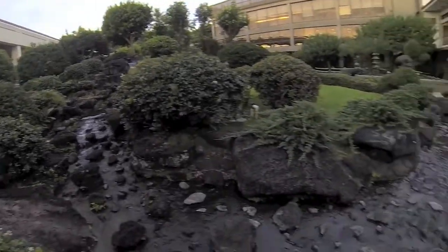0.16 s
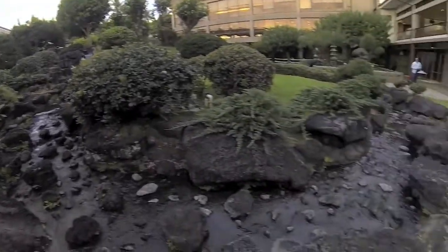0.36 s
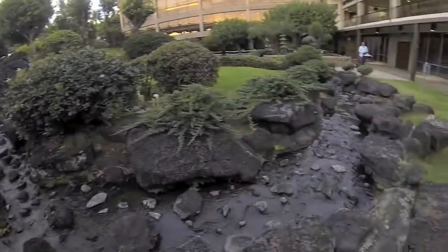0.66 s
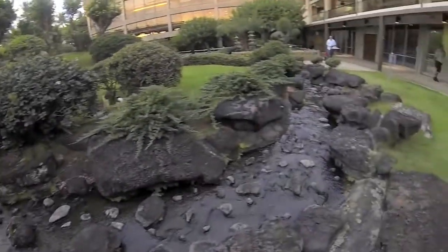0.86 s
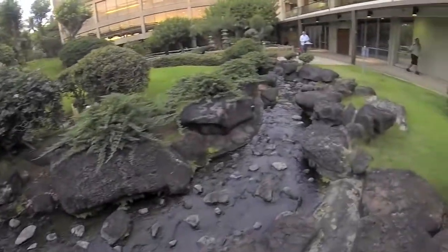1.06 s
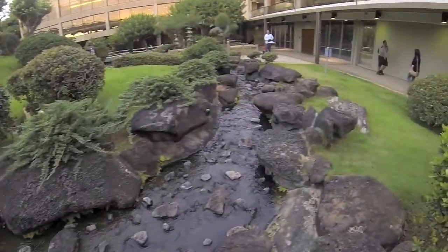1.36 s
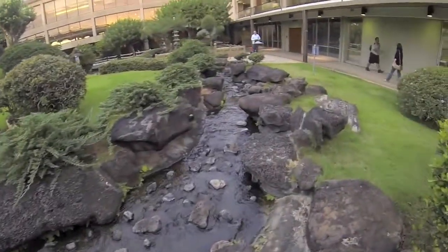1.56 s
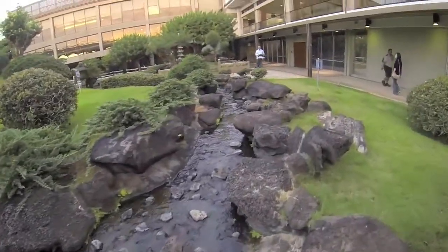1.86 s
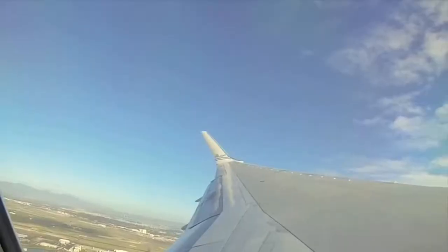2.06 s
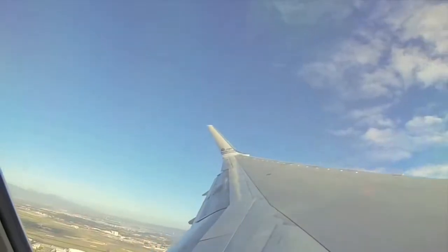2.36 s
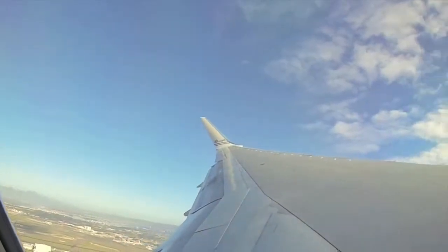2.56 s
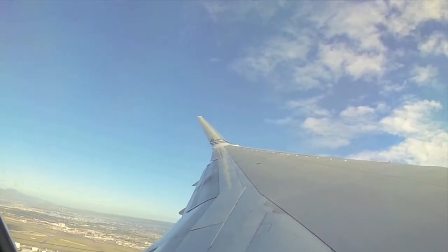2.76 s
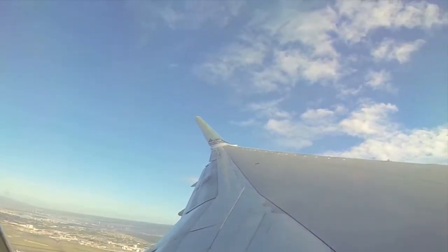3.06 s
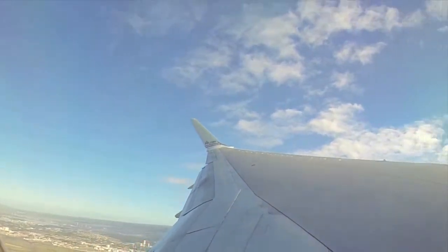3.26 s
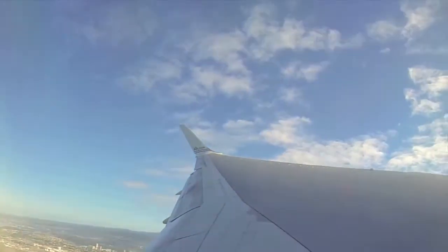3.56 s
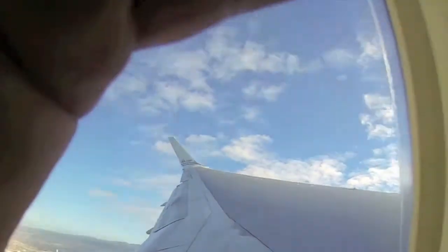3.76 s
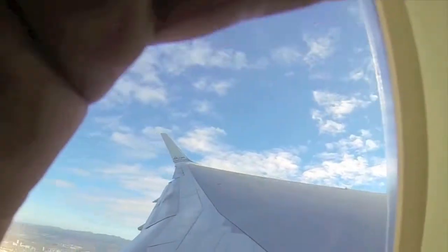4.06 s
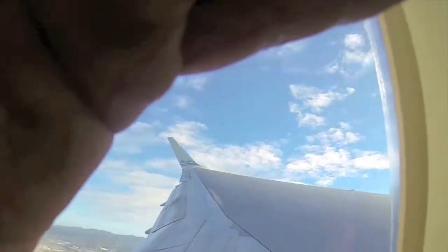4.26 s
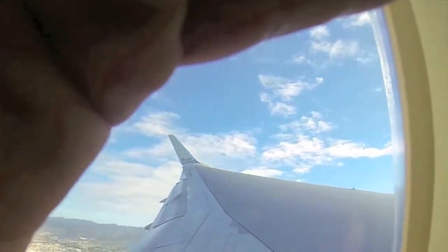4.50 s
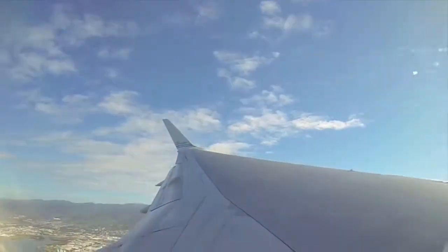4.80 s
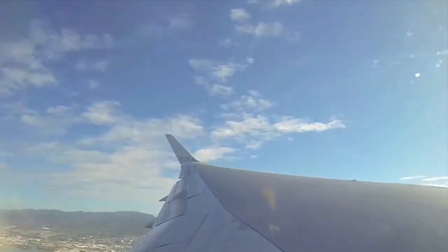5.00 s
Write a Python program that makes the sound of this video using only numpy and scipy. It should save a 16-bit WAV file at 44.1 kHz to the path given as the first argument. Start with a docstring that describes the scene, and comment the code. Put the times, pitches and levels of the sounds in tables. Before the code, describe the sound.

Low microphone rumble and faint water, then steady airliner cabin roar and hum that dips and swells as a hand grips the microphone.

```python
"""A deep handling rumble comes first, with soft knocks and muffled water: a garden brook, heard from
a microphone inside a small plastic camera carried along it. Then the scene changes to the window of
a climbing airliner, where airflow and engines roar and ring in the case, with faint turbine whines.
Right at the microphone a hand closes round the case and damps its ringing, rubs and clicks on it,
then presses it to the window, where it rings again."""
import sys
import numpy as np
from scipy import signal
from scipy.fft import rfft, irfft
from scipy.io import wavfile
from scipy.ndimage import uniform_filter1d

SR = 44100
rng = np.random.default_rng(int(sys.argv[2]) if len(sys.argv) > 2 else 0)


def wrap_up_sound(samples):
    """Save the sound to the file named by the first command line argument, as 16-bit audio."""
    columns = np.atleast_2d(samples).T
    # keep every value between -1 and 1, then stretch to whole-number steps
    tamed = np.clip(columns, -1, 1)
    steps = np.round(tamed * 32767).astype(np.int16)
    wavfile.write(sys.argv[1], SR, steps)


N = 226432
T = np.arange(N) / SR
HZ = np.maximum(np.arange(N // 2 + 1) * SR / N, 1)


# Airflow and engines at the window seat: f/Hz, relative level/dB
ROAR_SPECTRUM = [(25, -23), (60, -13), (110, -6), (170, -3.5), (280, -5), (420, 0), (700, -0.5), (1200, -2),
                 (1700, -13), (2100, -8), (2600, -14), (3200, -23.5), (4500, -36.5), (7000, -40.5)]
# Resonances of the case round the microphone, in each hold: f/Hz, width/Hz, boost/dB
LOOSE_MODES = [(395, 39, 10), (548, 225, 4), (957, 98, 13.5), (1600, 300, 6.5), (3020, 240, 4.5)]
GRIPPED_MODES = [(376, 48, 8.5), (1026, 46, 3.5), (2720, 460, -2)]
PRESSED_MODES = [(90, 130, 8), (240, 97, -8.5), (380, 86, 9), (478, 28, 9), (560, 49, -1), (725, 180, -4.5),
                 (924, 175, 13), (1336, 120, 7), (1744, 24, 13.5), (2610, 390, 6.5)]
# Brief swells of the roar: t/s, added level/dB
ROAR_SWELLS = [(3.18, 1.5), (3.36, 2), (3.59, 1), (5.05, 2.5)]

def roar(grip, pressure, loose_db=-25, grip_db=-5, press_db=3.5, flutter_db=0.55, swell_s=0.029):
    """Turbulent noise rings the case; gripping damps it, pressing it to the window feeds it."""
    holds = (LOOSE_MODES, GRIPPED_MODES, PRESSED_MODES)
    loose, gripped, pressed = (noise(colour(ROAR_SPECTRUM, modes)) for modes in holds)
    in_hand = np.sqrt(1 - grip) * loose + np.sqrt(grip) * gripped
    swell_db = sum(db * np.exp(-((T - s) / swell_s) ** 2) for s, db in ROAR_SWELLS)
    level_db = loose_db + grip_db * grip + press_db * pressure + swell_db + flutter_db * drift(7.9)
    return from_db(level_db) * (np.sqrt(1 - pressure) * in_hand + np.sqrt(pressure) * pressed)


# The hand closes round the case: t/s, length/s, firmness aimed for (0-1)
GRIPS = [(3.44, 0.086, 0.61), (3.668, 1.7, 0.96)]

def hand(ramp_s=0.12, pressed_s=4.9, lean_s=0.088):
    """Grip on the case and pressure against the window, both 0-1; the push is full at pressed_s."""
    grip = sum(firmness * held(s, length, ramp_s) for s, length, firmness in GRIPS)
    pressure = np.exp(np.minimum(T - pressed_s, 0) / lean_s)
    return np.clip(grip, 0, 1), pressure


# Handling rumble on the garden walk, right at the microphone: f/Hz, relative level/dB
RUMBLE_SPECTRUM = [(15, 2), (26, 3.5), (42, -12), (65, -9.5), (90, -23.5), (120, -26), (160, -37),
                   (240, -45.5), (380, -48.5), (600, -64.5)]
# The case sways with the walk: t/s, length/s, added level/dB
SWAYS = [(0.0, 0.32, 2), (0.49, 0.557, 4), (1.57, 0.12, 4.5), (1.8, 0.21, 5)]

def handling_rumble(calm_db=-27, ramp_s=0.078):
    """Carrying shakes the case with a deep rumble that grows with each sway."""
    rumble = noise(colour(RUMBLE_SPECTRUM))
    rumble /= np.sqrt(uniform_filter1d(rumble ** 2, size=SR // 6))   # the walk alone sets the swell
    sway_db = sum(db * held(s, length, ramp_s) for s, length, db in SWAYS)
    return from_db(calm_db + sway_db) * rumble


# Knocks on the microphone's case: t/s, peak level/dB, ring f/Hz, upper edge f/Hz (higher is harder)
KNOCKS = [(0.21, -31, 220, 417), (0.226, -36, 216, 420), (0.237, -33, 220, 450), (0.249, -32.5, 190, 300),
          (1.117, -31.5, 174, 450), (1.754, -16, 158, 643), (3.547, -29.5, 45, 110), (4.152, -27, 220, 500),
          (4.627, -7, 613, 6000)]

def knocks(cycles=2.46, bass_edge=0.55):
    """A blow gives the case one heavily damped swing; a soft contact takes the top off it."""
    out = np.zeros(N)
    for s, db, hz, edge_hz in KNOCKS:
        swing = ring(np.arange(N) == round(s * SR), hz, cycles / hz)
        swing = signal.sosfilt(signal.butter(3, edge_hz, fs=SR, output="sos"), swing)
        swing = signal.sosfilt(signal.butter(1, bass_edge * hz, "high", fs=SR, output="sos"), swing)
        out += from_db(db) * swing / np.abs(swing).max()
    return out


# Skin on plastic, right at the microphone: f/Hz, relative level/dB
FRICTION_SPECTRUM = [(2500, -23), (4500, -16), (5700, -1.5), (7000, -9), (9000, -7.5), (12000, 5),
                     (14000, 4.5), (15700, -10)]
# Finger slides: t/s, length/s, level/dB, brightness/(dB per octave)
RUBS = [(2.512, 0.053, -55, 1), (3.547, 0.017, -40.5, -13), (3.745, 0.019, -51, 0),
        (3.819, 0.033, -47.5, -13), (3.873, 0.031, -54, -7), (4.208, 0.025, -53, -1),
        (4.314, 0.021, -44.5, -1.5), (4.613, 0.034, -39.5, -2), (4.642, 0.065, -32.5, -4.5),
        (4.713, 0.028, -42.5, -20)]
# Small sharp ticks of the case: t/s, relative level/dB
TICKS = [(2.533, -41), (2.572, -30), (3.853, -25.5), (4.154, -29.5), (4.207, -35), (4.647, -16)]

def fingers(edge_s=0.011, grain_db=1.3, tick_t60=0.0075):
    """Skin sticks and slips on the plastic in grainy bursts; the case ticks now and then."""
    friction = colour(FRICTION_SPECTRUM)
    grain = from_db(grain_db * drift(200))
    rubs = np.zeros(N)
    for s, length, db, brightness in RUBS:
        tilt = from_db(brightness * np.log2(HZ / HZ[-1]))
        rubs += from_db(db) * held(s, length, edge_s) * grain * noise(friction * tilt)
    tick_decays = sum(from_db(db - 60 * np.abs(T - s) / tick_t60) * (T >= s) for s, db in TICKS)
    return rubs + .5 * tick_decays * noise(friction)


# Shaft and turbine tones, heard from inside the cabin:
# harmonic number, level/dB held loosely, change/dB at full grip, change/dB at full pressure
SHAFT_HARMONICS = [(1, -48, 8, 4), (4, -46.5, -8, 6), (5, -59, -12, 6)]
TURBINE_HARMONICS = [(3, -72.5, -4, 1), (4, -72.5, 3.5, -1)]

def engines(grip, pressure, turbine_hz=2412.5):
    """The shaft hum sags and partly recovers; two turbine harmonics whine steadily far above it."""
    shaft = rotor(shaft_speed(), SHAFT_HARMONICS, grip, pressure, wander=.001, waver_db=1.0)
    turbine = rotor(turbine_hz, TURBINE_HARMONICS, grip, pressure, wander=.0006, waver_db=2.0)
    return shaft + turbine


def shaft_speed(climb_hz=575.3, sag_hz=30, ease_at_s=3.4, ease_s=.56, pick_up_s=4.3, hz_per_s=16):
    """Steady climb power, a smooth throttling back, then a slow pick-up; in Hz."""
    eased = .5 - .5 * np.cos(np.pi * np.clip((T - ease_at_s) / ease_s, 0, 1))
    return climb_hz - sag_hz * eased + hz_per_s * np.maximum(T - pick_up_s, 0)


def rotor(hz, harmonics, grip, pressure, wander, waver_db):
    """Wavering harmonics of a spinning rotor; the hold decides how much reaches the microphone."""
    phase = 2 * np.pi * np.cumsum(hz * (1 + wander * drift(12.0))) / SR
    out = np.zeros(N)
    for number, loose_db, grip_db, press_db in harmonics:
        level_db = loose_db + grip_db * grip + press_db * pressure + waver_db * drift(24)
        out += np.sqrt(2) * from_db(level_db) * np.sin(round(number) * phase)
    return out


# Hiss through a gap between the fingers, close to the microphone: f/Hz, relative level/dB
GAP_SPECTRUM = [(1900, 4.5), (2600, 7), (3300, -9), (4500, -14.5), (5300, -15), (7000, -30), (9000, -20),
                (10500, -13), (13500, -12), (15700, -17)]

def finger_gap(open_s=4.315, length_s=0.707, ramp_s=0.026, hiss_db=-41.5,
               whistle_db=-62, whistle_hz=8080, half_width_hz=150, delay_s=0.045):
    """As the fingers shift, a narrow gap lets in brighter hiss and, a moment later, a thin whistle."""
    hiss = held(open_s, length_s, ramp_s) * noise(colour(GAP_SPECTRUM))
    resonance = 1 / (1 + ((HZ - whistle_hz) / half_width_hz) ** 2)
    whistle = held(open_s + delay_s, length_s - delay_s, ramp_s) * noise(resonance)
    return from_db(hiss_db) * hiss + from_db(whistle_db) * whistle


# The brook beside the walk, heard through the case: f/Hz, relative level/dB
BROOK_SPECTRUM = [(300, -5), (700, -12), (1100, -11.5), (1700, -7.5), (2300, -18), (3400, -14.5),
                  (4800, -18.5), (6000, -23.5), (7700, -24), (9500, -32), (11000, -26.5), (12400, -34),
                  (13300, -29), (13700, -60)]
# Resonances of the case that colour the water: f/Hz, width/Hz, boost/dB
BROOK_CASE_MODES = [(1490, 640, 16.26), (2900, 410, 11.2), (4115, 75, 8.5)]

def brook(level_db=-50, splashes_per_s=600, splash_share=0.51, splash_t60=0.0058):
    """Little splashes, each a short spray of noise, merge into a smooth rush, muffled by the case."""
    splashes = (rng.random(N) < splashes_per_s / SR) * rng.random(N)
    decay = from_db(-60 / (splash_t60 * SR))
    sprays = signal.lfilter([1], [1, -decay], splashes + 1e-18)
    water = rng.standard_normal(N) + splash_share * rms_one(sprays * rng.standard_normal(N))
    muffled = irfft(rfft(water) * colour(BROOK_SPECTRUM, BROOK_CASE_MODES), N)
    return from_db(level_db) * rms_one(muffled)


# Treble of the airflow at the window, behind the roar: f/Hz, relative level/dB
HISS_SPECTRUM = [(3500, -0.5), (5000, -11.5), (5800, -16), (6800, -14), (8700, -7.5), (10500, -2),
                 (12000, 5), (13500, -0.5), (15700, -6)]
# Narrow peaks in that hiss: f/Hz, width/Hz, boost/dB
HISS_PEAKS = [(12000, 160, 8.5), (4290, 58, 13.5)]

def airflow_hiss(level_db=-52.5, ripple_db=-2.5, spacing_hz=25):
    """Air hisses steadily; many short reflections leave fine, irregular peaks and dips in its spectrum."""
    ripple = np.interp(HZ / spacing_hz, np.arange(N), rng.standard_normal(N))
    return from_db(level_db) * noise(colour(HISS_SPECTRUM, HISS_PEAKS) * from_db(ripple_db * ripple))


def camera_whine(hz=12904, frame_hz=48.0, sharpness=1.4, level_db=-75):
    """The electronics beside the microphone sing faintly in one short burst per picture frame."""
    bursts = np.exp(sharpness * np.cos(2 * np.pi * frame_hz * T))
    phase = 2 * np.pi * np.cumsum(hz + 15 * drift(20)) / SR
    return from_db(level_db) * rms_one(bursts * np.sin(phase))


def colour(spectrum, modes=()):
    """Gain at every frequency: a broad spectrum, falling 24 dB per octave outside, plus resonances."""
    hz, db = np.transpose(spectrum)
    octaves_outside = np.maximum(np.log2(hz[0] / HZ), 0) + np.maximum(np.log2(HZ / hz[-1]), 0)
    level_db = np.interp(np.log(HZ), np.log(hz), db) - 24 * octaves_outside
    for centre, width, boost in modes:
        level_db += boost / (1 + (2 * (HZ - centre) / width) ** 2)
    return from_db(level_db)


def noise(gain):
    """Noise shaped by a gain at every frequency, rms 1."""
    return rms_one(irfft(rfft(rng.standard_normal(N)) * gain, N))


def drift(rate_hz):
    """Random wandering, mostly slower than rate_hz, rms 1."""
    return noise(1 / (1 + (HZ / rate_hz) ** 2))


def ring(clicks, hz, t60):
    """A unit click sets a damped sine ringing."""
    decay, step = from_db(-60 / (t60 * SR)), 2 * np.pi * hz / SR
    return signal.lfilter([0, np.sin(step)], [1, -2 * decay * np.cos(step), decay ** 2], clicks + 1e-18)


def held(start, length, ramp):
    """Rise towards 1, hold, fall; the ramps are centred on the two ends."""
    return np.clip(np.minimum(T - start, start + length - T) / ramp + .5, 0, 1)


def from_db(db):
    """Decibels to gain."""
    return 10 ** (np.asarray(db) / 20)


def rms_one(x):
    """Scale to rms 1."""
    return x / np.sqrt(np.mean(x ** 2) + 1e-20)


def scene(garden_fade_s=1.956, change_s=2.058, cabin_full_s=2.148):
    """One microphone in two places: the brookside fades out, the window seat fades in."""
    garden = handling_rumble() + brook() + camera_whine()
    grip, pressure = hand()
    cabin = airflow_hiss() + roar(grip, pressure) + engines(grip, pressure) + finger_gap()
    outdoors = np.clip((change_s - T) / (change_s - garden_fade_s), 0, 1)
    aboard = np.clip((T - change_s) / (cabin_full_s - change_s), 0, 1)
    return (outdoors * garden + aboard * cabin + knocks() + fingers())[None]


def record(dry, cutoff_hz=15720):
    """The top of the microphone's signal is cut steeply."""
    return irfft(rfft(dry) / np.sqrt(1 + (HZ / cutoff_hz) ** 600), N)


dry = scene()
out = record(dry)
wrap_up_sound(out)
```